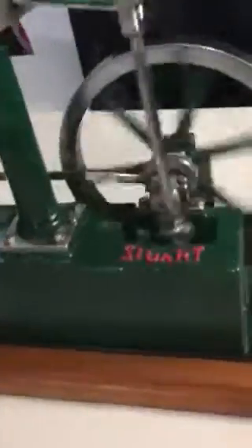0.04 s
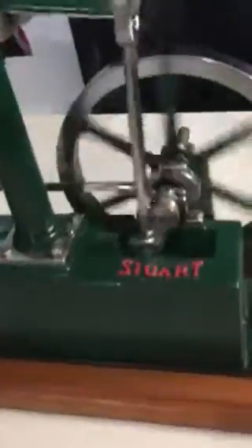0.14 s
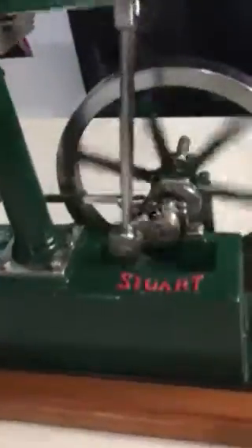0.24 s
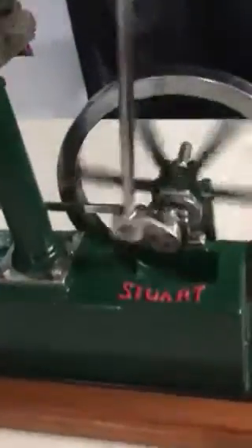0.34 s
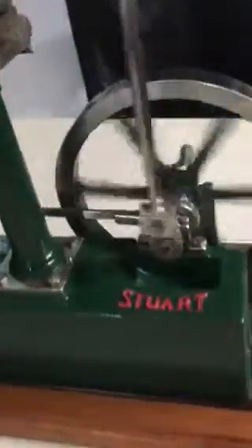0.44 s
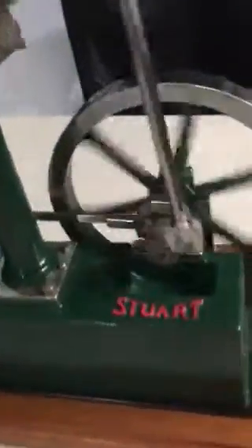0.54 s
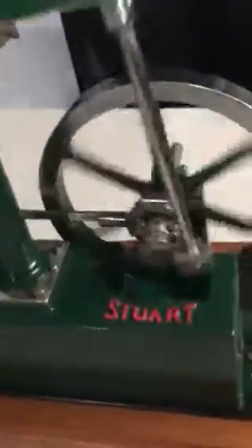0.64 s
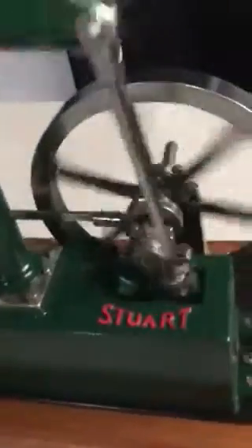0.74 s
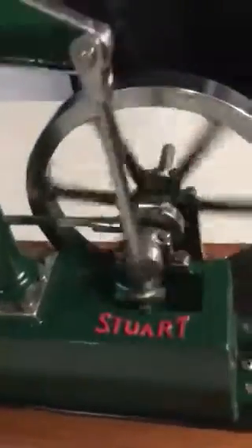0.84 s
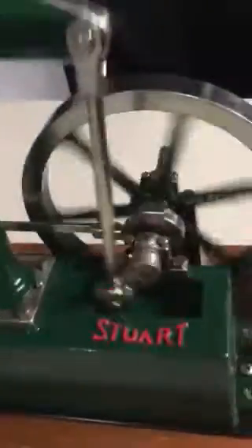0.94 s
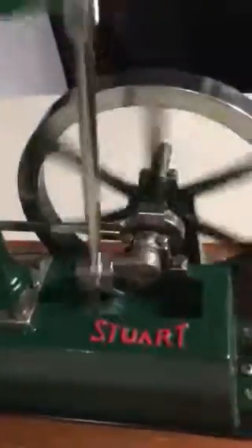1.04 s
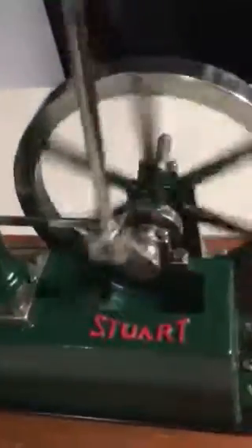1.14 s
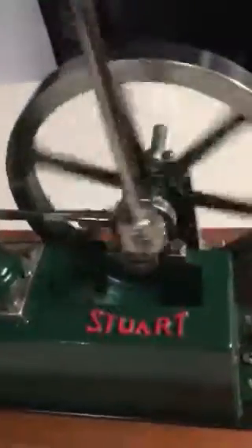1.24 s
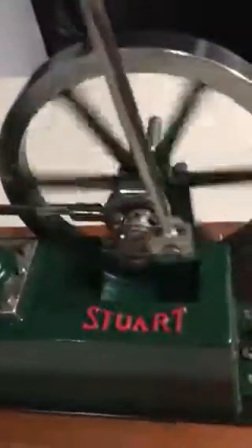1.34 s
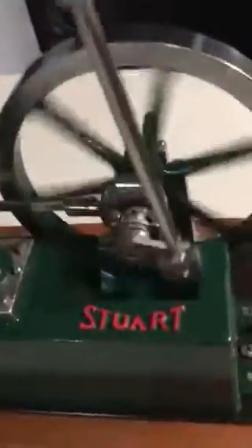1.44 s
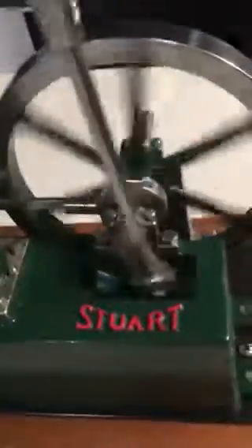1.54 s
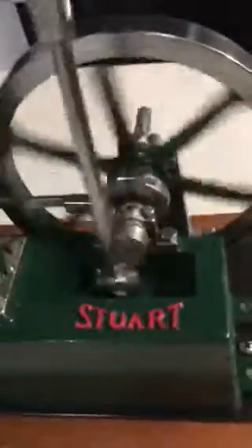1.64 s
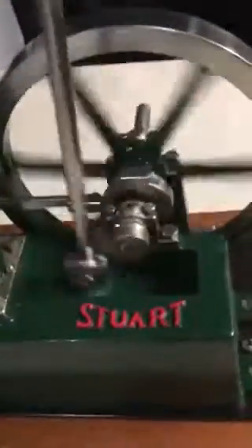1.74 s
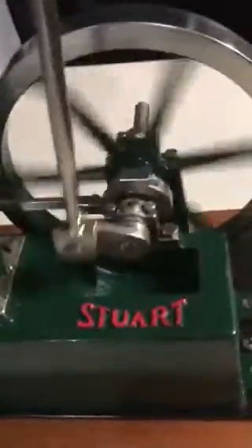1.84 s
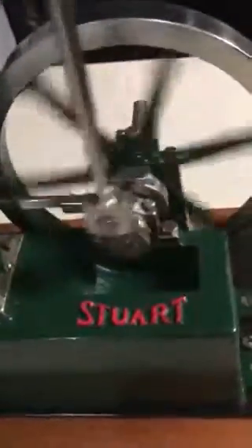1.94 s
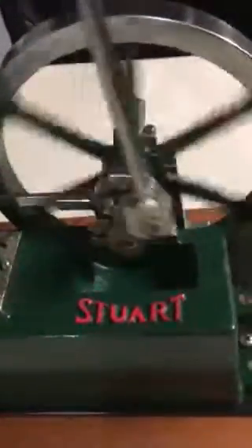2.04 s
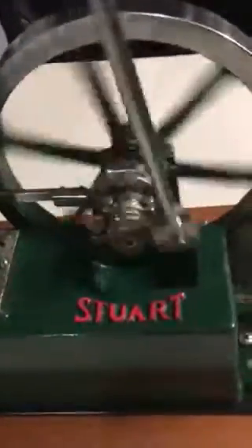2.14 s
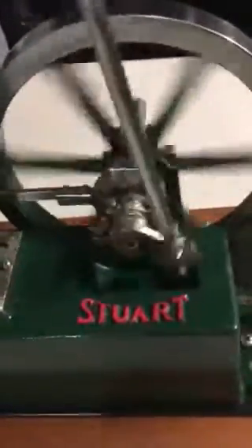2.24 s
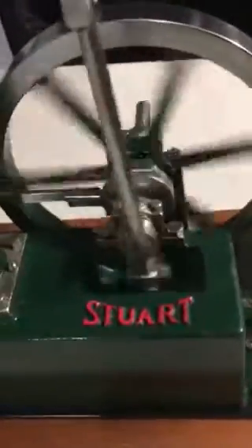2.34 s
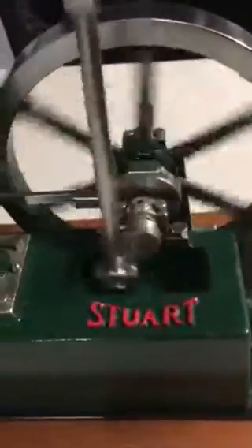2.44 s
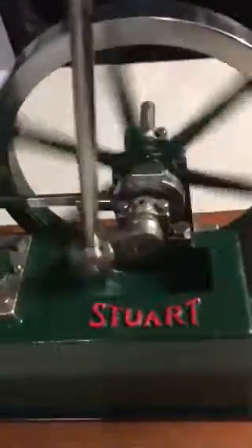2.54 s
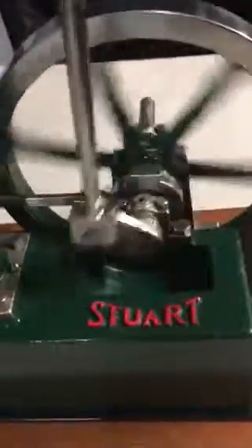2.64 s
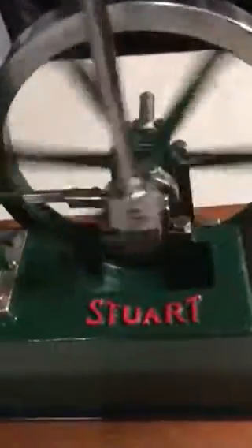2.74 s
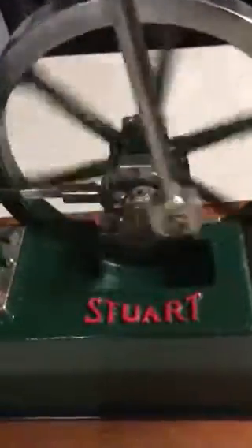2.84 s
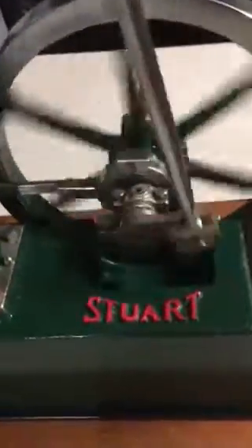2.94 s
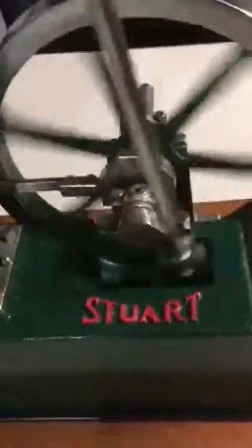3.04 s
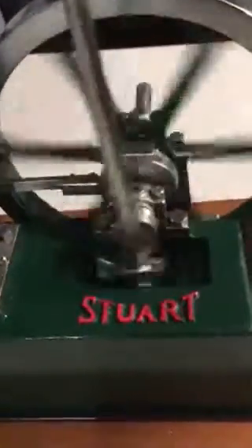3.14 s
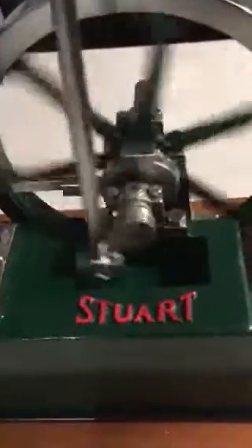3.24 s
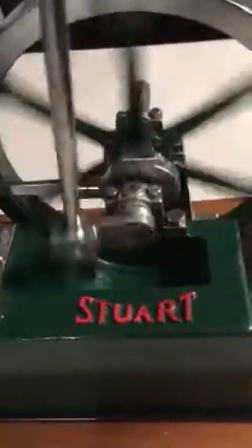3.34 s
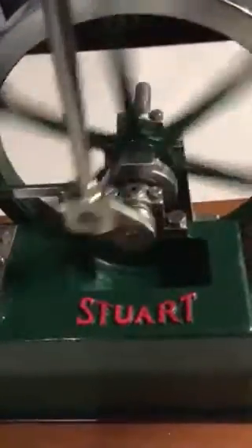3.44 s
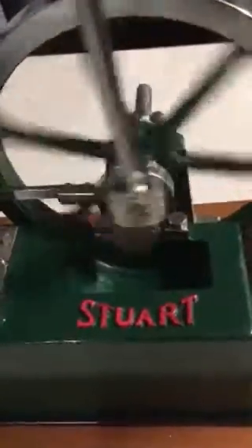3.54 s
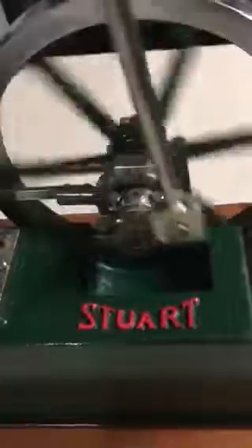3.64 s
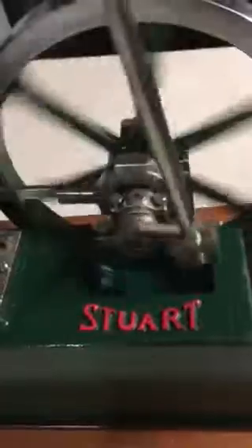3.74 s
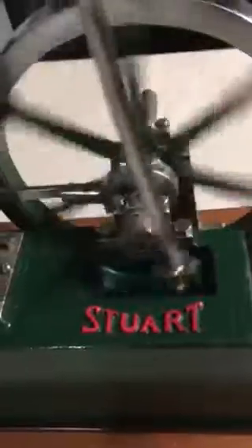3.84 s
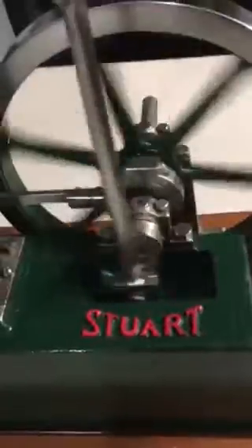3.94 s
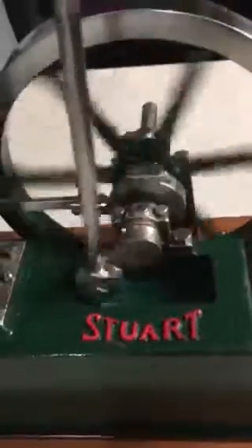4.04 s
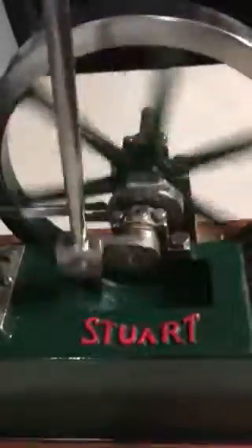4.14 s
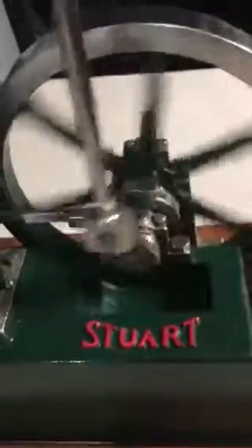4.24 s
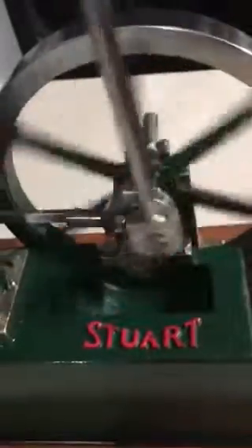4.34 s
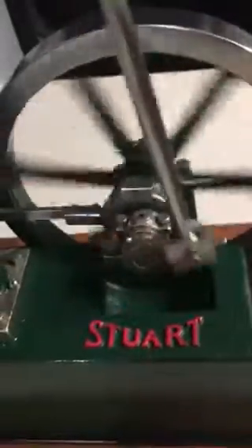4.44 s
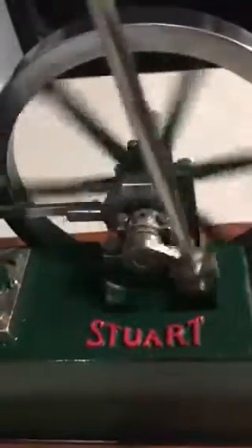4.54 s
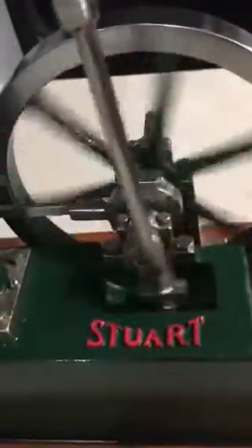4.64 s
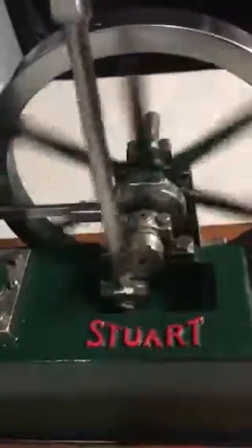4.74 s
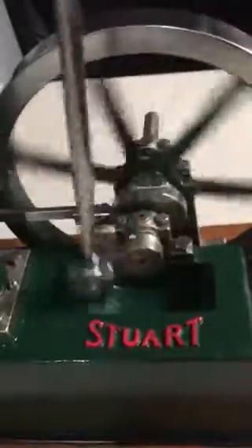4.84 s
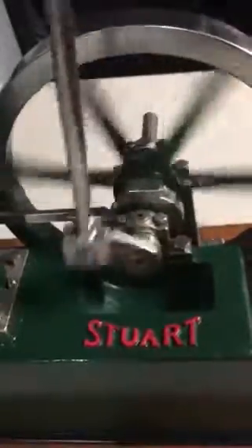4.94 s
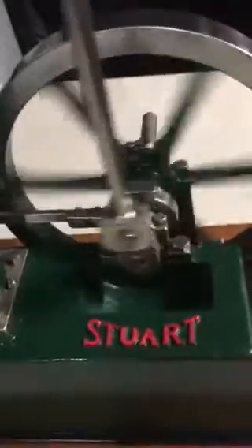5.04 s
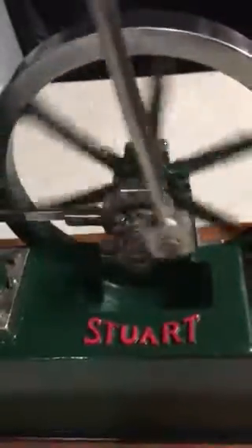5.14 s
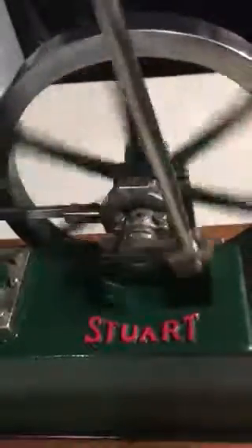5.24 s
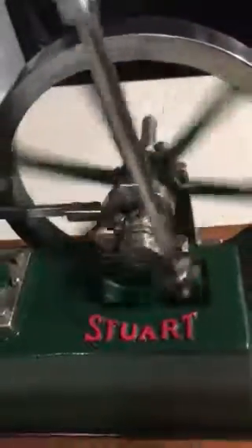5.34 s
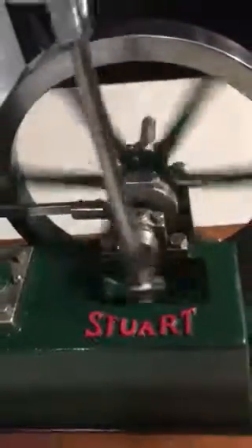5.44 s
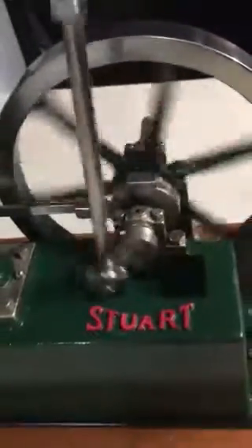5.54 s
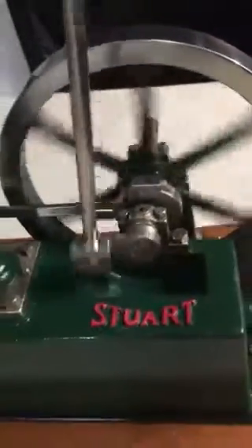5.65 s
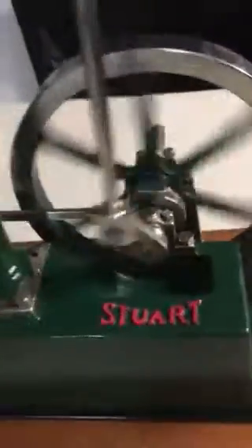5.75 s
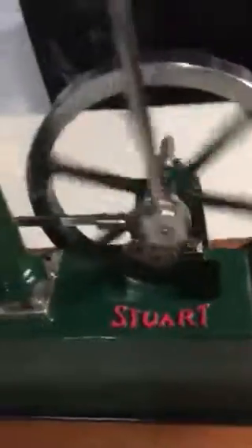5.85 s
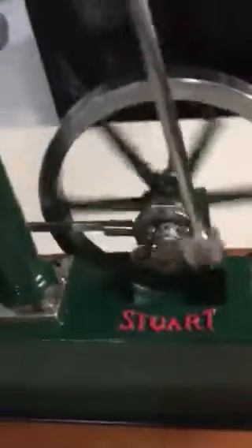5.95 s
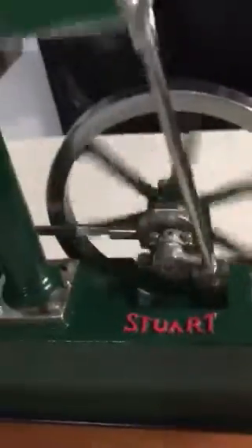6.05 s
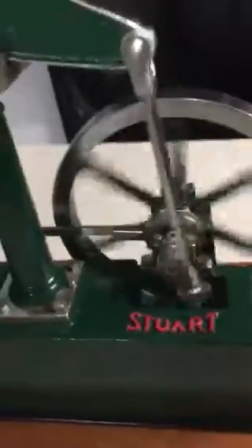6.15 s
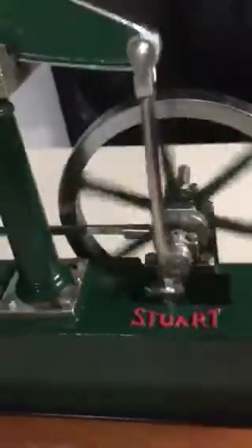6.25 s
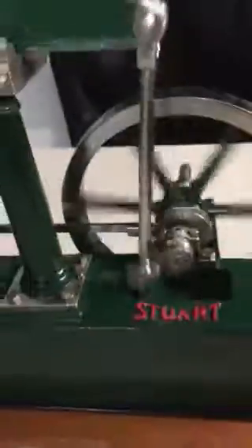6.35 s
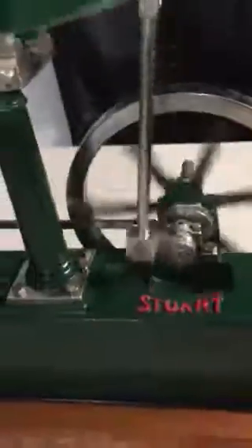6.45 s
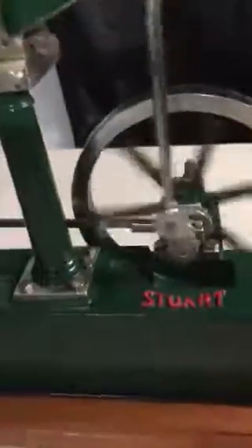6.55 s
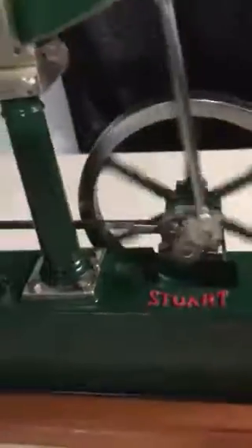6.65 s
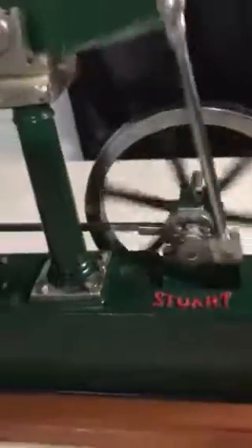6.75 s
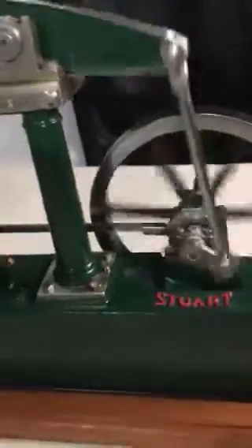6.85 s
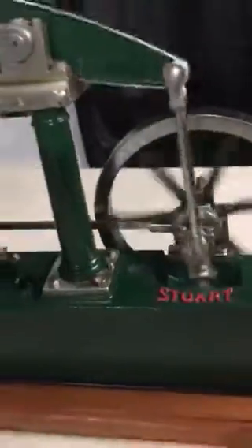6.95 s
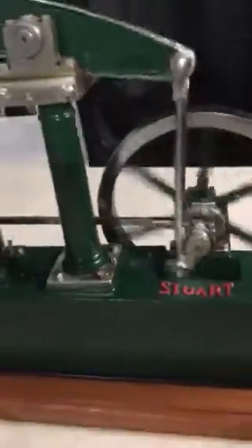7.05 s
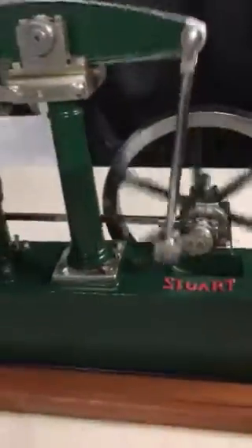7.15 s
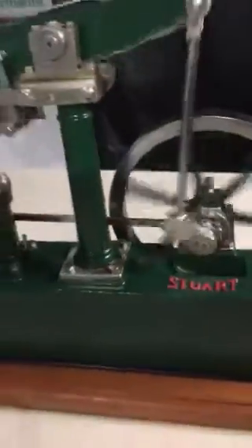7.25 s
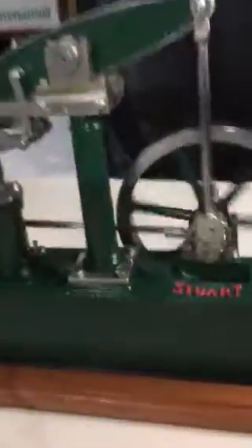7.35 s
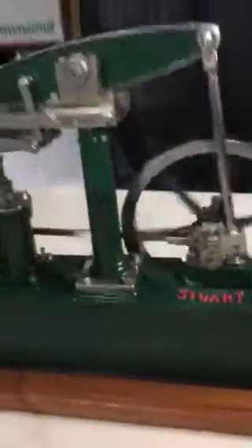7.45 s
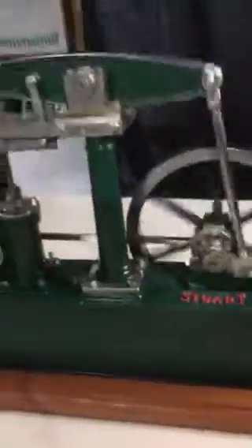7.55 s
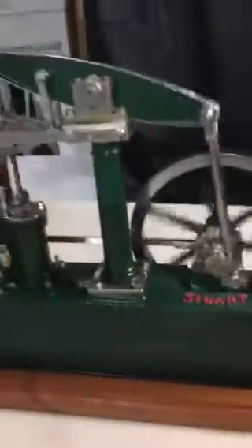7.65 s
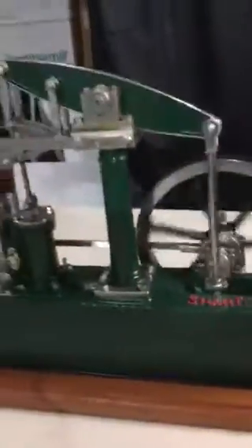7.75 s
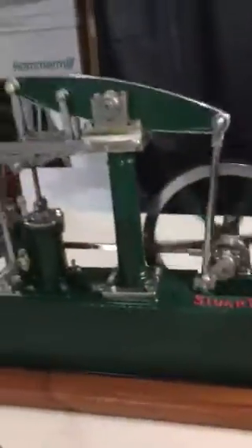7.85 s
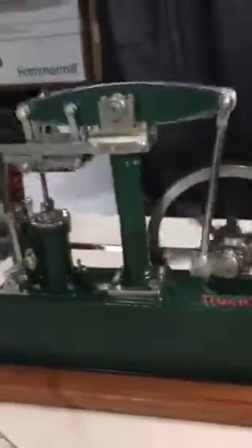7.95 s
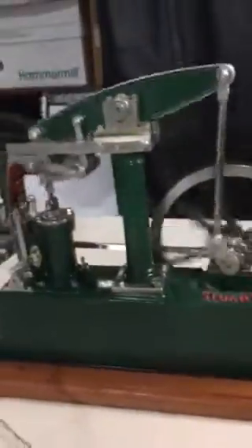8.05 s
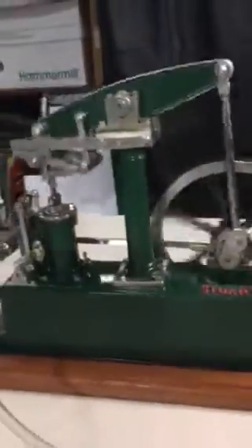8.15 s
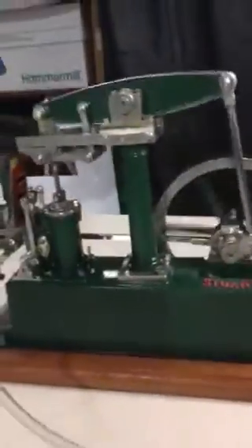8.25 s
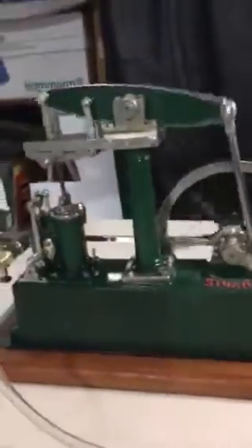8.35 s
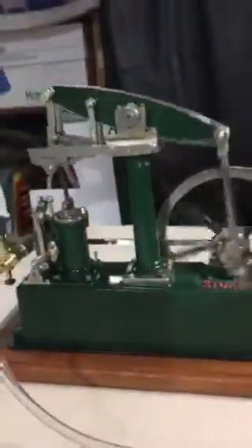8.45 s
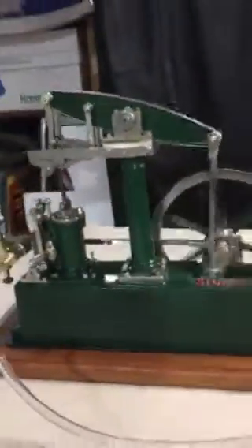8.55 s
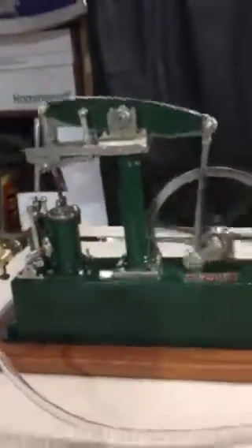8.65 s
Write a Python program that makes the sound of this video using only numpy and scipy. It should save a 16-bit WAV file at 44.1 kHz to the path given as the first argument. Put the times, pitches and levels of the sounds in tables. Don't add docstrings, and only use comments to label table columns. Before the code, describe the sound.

Sharp steel knocks repeat every three-quarters of a second over a hollow wooden boom, pulsing compressed-air hiss and light valve clicks.

```python
import sys
import numpy as np
from scipy import signal
from scipy.fft import rfft, irfft, next_fast_len
from scipy.io import wavfile
from scipy.ndimage import uniform_filter1d

SR = 44100
rng = np.random.default_rng(int(sys.argv[2]) if len(sys.argv) > 2 else 0)


def digitize_waveform(pressure):
    field = np.atleast_2d(pressure).T
    bounded = np.clip(field, -1, 1)
    quanta = np.round(bounded * 32767).astype(np.int16)
    wavfile.write(sys.argv[1], SR, quanta)


def gain_from_decibels(decibels):
    exponent = np.asarray(decibels, float) / 20
    return 10 ** exponent


N = 383669
TURN_S, CUT_S = .7635, .298

# (time [s], strength [dB], tick of the slack just before [dB])
KNOCKS = [(0.6101, -15, -15), (1.3716, -14.5, -11), (2.1359, -14, -11), (2.9064, -14, -10.5),
          (3.6609, -13, -38), (4.4317, -13.5, -11), (5.1933, -13, -18), (5.9537, -15, -13.5),
          (6.715, -17.5, -16), (7.4792, -19.8, -21), (8.2439, -20.5, -25)]
# (time [s], opening [dB], seats after [s], seating [dB])
VALVES = [(0.534, -42.5, .0434, -40), (1.294, -39.5, 0.043, -39), (2.0589, -40.5, .0442, -38),
          (2.828, -38, 0.042, -37), (3.6054, -39.5, 0.042, -35), (4.354, -38.5, 0.044, -37),
          (5.117, -38.5, 0.04, -37), (5.877, -40.5, .0446, -38.5), (6.638, -40.5, 0.042, -38),
          (7.4028, -43, 0.039, -42), (8.166, -43.5, 0.043, -41.5)]
# (time [s], cut-off [dB], link [dB])
CUTS = [(0.1423, -38, -40), (0.9055, -37, -41.5), (1.6678, -35.5, -37.5), (2.434, -36.5, -38),
        (3.2093, -35, -38.5), (3.9618, -35.5, -37.5), (4.7286, -34.5, -44), (5.489, -35.5, -39),
        (6.2502, -38, -41), (7.0138, -39.5, -42), (7.776, -41.5, -46.5), (8.544, -44, -48)]
# (frequency [Hz], level [dB], t60 [s])
PIN_MODES = [(5920, -13, 0.006), (6940, -1.5, 0.0056), (8400, -3, 0.0021), (10240, -12, 0.0014),
             (11900, -6, 0.003), (14520, -8, 0.002), (14720, -16, .004)]
# (frequency [Hz], level [dB], t60 [s])
FRAME_MODES = [(639.8, -23.5, 0.11), (735, -8.5, 0.035), (813, -21.5, 0.18), (926, -12.5, 0.027),
               (1130, -17.5, 0.098), (1247, -4, 0.02), (1316, -31, .25), (1459, -7.5, 0.031),
               (1612, -6.5, 0.035), (1690, -27, 0.03), (1938, -2, 0.004), (2134, -2.5, 0.022),
               (2359, -3, 0.0057), (2551, -6, 0.015), (2774, -11, 0.0077), (3390, -11.5, 0.0041),
               (3869, -5.5, 0.0089)]
# (frequency [Hz], level [dB], t60 [s])
BASE_MODES = [(88, -10, 0.58), (139.4, -8.5, 0.97), (180, -7.5, 0.42), (203.3, -1, 0.075),
              (215.8, -5.5, 0.53), (280.5, -10, 0.4), (313.6, -11.5, 0.47), (371.3, -9.5, 0.12),
              (494, -18, 0.093)]


def crank_knock():
    # (frequency [Hz], level [dB], t60 [s])
    bed_modes = [(80.7, -29, 0.19), (133.4, -13, 0.68), (176.6, -12, 0.66), (207.7, 6.5, 0.056),
                 (207, -10, 0.64), (278.4, -7.5, 0.25), (363.5, -3.5, 0.069), (414.7, -17, 0.36),
                 (481, -11, 0.2)]
    pin_s, pin_db, _ = np.transpose(KNOCKS)
    rows = contacts("knock", pin_s, pin_db)
    tick = strike(rows, column=1, modes=PIN_MODES, late_s=-.0002, cycles=8., scatter_db=1.,
                  detune=.008, crack_db=-7, fresh=.5)
    ring = strike(rows, column=2, modes=FRAME_MODES, late_s=-.0001, cycles=10.5, scatter_db=1.6,
                  detune=0.0032, crack_db=-7, fresh=.3)
    thump = strike(rows, column=3, modes=bed_modes, late_s=-0.00308, cycles=3.0, scatter_db=0.7,
                   detune=.001, crack_db=-23, fresh=0.38)
    return tick, ring, thump


def pin_slack():
    lead_s, ring_db = .0081, -36
    pin_s, pin_db, slack_db = np.transpose(KNOCKS)
    rows = list(zip(pin_s - lead_s, slack_db, pin_db + ring_db))
    for s, tick_db, frame_db, _ in contacts("knock", pin_s, pin_db):
        rows.append((s - .0024, tick_db - 17, frame_db - 16))
    tick = strike(rows, column=1, modes=PIN_MODES, late_s=.0001, cycles=6., scatter_db=8.0,
                  detune=0.019, crack_db=-5.5, fresh=0.96)
    return tick * gain_from_decibels(-4.5), loose_frame(rows), 0


def slide_valve():
    # (time after the first blow [s], level [dB])
    bounces = [
        (.0055, -3),
        (.010, -20),
        (.016, -5),
    ]
    open_s, open_db, seat_s, seat_db = np.transpose(VALVES)
    opening = contacts("valve", open_s, open_db)
    chatter = []
    for s, tick_db, ring_db, thump_db in opening:
        for after_s, db in bounces:
            chatter.append((s + after_s, tick_db + db, ring_db + db - 5, thump_db + db))
    return rod_joints(opening + chatter + contacts("seat", open_s + seat_s, seat_db))


def beam():
    # (time [s], level [dB])
    landings = [(0.2179, -38.5), (0.9817, -36.5), (1.7461, -35.5), (2.5118, -36), (3.2878, -35.5),
                (4.0366, -35), (4.8064, -35.5), (5.5658, -36.5), (6.327, -37.5), (7.088, -37.5),
                (7.8514, -41.5), (8.6188, -41.5)]
    # (time after landing [s], level [dB])
    rattle = [
        (.006, -6),
        (.011, -8),
        (.019, -17),
    ]
    lift_lag_s, settle_lag_s, settle_db = .0652, 0.016, -5.5
    land_s, beam_db = np.transpose(landings)
    cut_s = np.array(CUTS)[:, 0]
    lift = contacts("lift", cut_s + lift_lag_s, beam_db)
    land = contacts("land", land_s, beam_db)
    rattles = []
    for s, tick_db, ring_db, thump_db in land:
        for after_s, db in rattle:
            rattles.append((s + after_s, tick_db + db + 1, ring_db + db, thump_db + db))
    tick, ring, thump = rod_joints(lift + land + rattles)
    return tick, ring + lever_stop(list(zip(land_s + settle_lag_s, beam_db + settle_db))), thump


def cut_off_lever():
    # (frequency [Hz], level [dB], t60 [s])
    stud_modes = [(3720, 2, 0.014), (4370, -14, 0.014), (5870, 7, 0.0069), (6850, -18, 0.0036)]
    # (frequency [Hz], level [dB], t60 [s])
    lever_modes = [(1007.6, -14.5, 0.03), (1650, -10, 0.016), (1857, -6, 0.014), (2120, 2, 0.014),
                   (2270, 1.5, 0.017), (2600, -8, 0.012), (3335, -13, 0.012), (4023, -10, 0.012)]
    link_lead_s = .0688
    cut_s, cut_db, link_db = np.transpose(CUTS)
    cut = contacts("cut", cut_s, cut_db)
    rows = contacts("link", cut_s - link_lead_s, link_db) + cut
    tick = strike(rows, column=1, modes=stud_modes, late_s=.0001, cycles=1.9, scatter_db=4.5,
                  detune=0.054, crack_db=5, fresh=0.88)
    ring = strike(rows, column=2, modes=lever_modes, late_s=-0.00023, cycles=10.0, scatter_db=2.5,
                  detune=0.021, crack_db=-7.5, fresh=0.61)
    rebound = lever_stop([(s + .010, ring_db - 3) for s, _, ring_db, _ in cut])
    return tick * gain_from_decibels(4.5), ring * gain_from_decibels(8.5) + rebound, loose_base(rows)


def rod_joints(rows):
    # (frequency [Hz], level [dB], t60 [s])
    rod_modes = [(3700, -6, 0.0055), (6160, 2, 0.0078), (8300, 8, .005), (9800, 2.5, 0.012),
                 (13000, 8, 0.0073), (13700, -4, 0.0047)]
    tick = strike(rows, column=1, modes=rod_modes, late_s=.0001, cycles=5.8, scatter_db=3.0,
                  detune=0.066, crack_db=-2, fresh=0.88)
    return tick * gain_from_decibels(5.5), loose_frame(rows), loose_base(rows)


def lever_stop(rows):
    # (frequency [Hz], level [dB], t60 [s])
    stop_modes = [(378.7, -4, 0.12), (655, 1, 0.031), (905, 1.5, 0.024), (1085, -3, 0.073),
                  (1485, -22, .03)]
    return strike(rows, column=1, modes=stop_modes, late_s=0, cycles=2.8, scatter_db=4.5,
                  detune=0.045, crack_db=-9.5, fresh=0.59)


def loose_frame(rows):
    return gain_from_decibels(6.0) * strike(rows, column=2, modes=FRAME_MODES, late_s=0.00019, cycles=6., scatter_db=3.0,
                             detune=0.041, crack_db=-5.5, fresh=0.89)


def loose_base(rows):
    return gain_from_decibels(4.5) * strike(rows, column=3, modes=BASE_MODES, late_s=-0.0011, cycles=1.7, scatter_db=2.5,
                             detune=0.016, crack_db=-16.5, fresh=1.0)


def contacts(part, s, db):
    # (steel tick [dB], casting ring [dB], base thump [dB]) over its strength
    parts = dict(knock=(1.5, 0, -11.5), valve=(3.5, -0.7, -16.5), seat=(0.83, 0, -8), link=(-1, 0, -32),
             cut=(-2.5, 0, -9), lift=(-1.3, -11, -9), land=(-0.85, -3.3, -8))
    thump_share, tick_scatter_db = 0.37, 2.5
    tick, ring, thump = parts[part]
    loose = 0 if part == "knock" else tick_scatter_db * rng.standard_normal(len(s))
    thump_db = db.mean() + thump_share * (db - db.mean()) + thump
    return list(zip(s, db + tick + loose, db + ring, thump_db))


def strike(blows, column, modes, late_s, cycles, scatter_db, detune, crack_db, fresh):
    out = np.zeros(N + SR)
    hz, db, t60 = np.transpose(modes)[:, :, None]
    rise = cycles / np.sqrt(hz * hz.max())
    t = np.arange(int(SR * (.75 * t60.max() + rise.max()))) / SR
    sign = (-1.) ** np.arange(len(hz))[:, None]
    build = np.sin(np.pi / 2 * np.minimum(t / rise, 1)) ** 2
    shape = sign * build * gain_from_decibels(db - 60 * np.maximum(t - rise, 0) / t60)
    band = signal.butter(2, [0.8 * hz.min(), min(0.82 * hz.max(), .4 * SR)], "band", fs=SR)
    crack = gain_from_decibels(crack_db) * np.sqrt(np.sum(shape ** 2, axis=0))
    usual = np.sqrt(1 - min(fresh, 1) ** 2) * rng.standard_normal(len(t))
    for row in blows:
        pitch, level = rng.standard_normal((2, len(hz), 1))
        grit = usual + fresh * rng.standard_normal(len(t))
        tones = np.sin(2 * np.pi * hz * (1 + detune * pitch) * t)
        ring = np.sum(shape * gain_from_decibels(scatter_db * level) * tones, axis=0)
        ring += signal.lfilter(*band, crack * grit) * np.sqrt(SR / 2 / hz.max())
        i = int((row[0] + late_s) * SR)
        out[i:i + len(t)] += gain_from_decibels(row[column]) * ring / np.abs(ring).max()
    return out[:N]


def crank():
    valve_s = .6865
    knock, cut, valve = (np.array(table)[:, 0] for table in (KNOCKS, CUTS, VALVES))
    s = np.r_[knock[0] - TURN_S, knock, knock[-1] + TURN_S, cut, valve]
    turns = np.arange(len(knock) + 2) * TURN_S
    angle = np.r_[turns, turns[:len(cut)] + CUT_S, turns[:len(valve)] + valve_s]
    return np.interp(np.arange(N) / SR, np.sort(s), np.sort(angle)) % TURN_S


def air(turn, far):
    # (frequency [Hz], width [Hz], up stroke [dB], down stroke [dB],
    # change when far [dB], share of the swell with piston speed [ratio])
    ports = [(1403, 208, 0.5, -2, -9, 1), (3029, 100, 2, -2, -8, 1), (3260, 480, -15.5, -20, 6.5, 0.85),
             (5020, 220, -2.5, -6.5, 5, 1.5), (5810, 610, -8, -17.5, -5, 1.5),
             (6263, 240, -1, -3, -15.5, 0.89), (7660, 820, -12.5, -18, -5, 2.1),
             (8500, 320, -4.5, -5.5, -9, 1.37), (9560, 360, -9.5, -5, -25, 0.36),
             (10750, 430, -11.5, -10, -15, 1.5), (12130, 630, -33, -17.5, 0.5, 0.27)]
    # (frequency [Hz], density [dB])
    leak_shape = [(300, -0.5), (500, -9), (1200, -9.5), (2200, -5), (4000, -13.5), (4600, -5), (6000, -6),
                  (7500, -10), (9500, -5.5), (11000, -10), (13000, -7.5)]
    # (frequency [Hz], density [dB])
    seep_shape = [(3000, -1), (9000, -3), (12000, -0.5), (14500, 7), (15750, 0), (15900, -38), (16900, -40)]
    seep_db = -56.5
    hiss_db, leak_db = hiss_level(turn), leak_level(turn)
    down = np.clip((turn - CUT_S) / 0.023, 0, 1)
    flow = cylinder(turn, far)
    for hz, width, up_db, down_db, far_db, swell in ports:
        db = up_db + (down_db - up_db) * down + far_db * far
        db = db + (swell - 1) * (hiss_db - hiss_db.max()) + 0.7 * walk(12)
        flow = flow + gain_from_decibels(db) * np.sqrt(width / 1500) * peak(hz, width)
    leak = gain_from_decibels(leak_db - 7.4 * far + 1.5 * walk(20)) * noise(leak_shape)
    seep_level = seep_db + 0.34 * (leak_db - leak_db.mean()) - 8.4 * far + 0.6 * walk(9.3)
    return gain_from_decibels(hiss_db) * flow + leak + gain_from_decibels(seep_level) * noise(seep_shape)


def cylinder(turn, far):
    # (from [s], to [s] after the knock, from [Hz], to [Hz], width [Hz],
    # level [dB], change when far [dB])
    slides = [(.10, 0.257, 8420, 9550, 260, -2, -7), (.11, 0.21, 6530, 7100, 220, -4, -4),
              (.17, 0.305, 7400, 6550, 163, -14, 8), (.11, 0.216, 9600, 10600, 199, -4.5, -11),
              (.40, 0.596, 8800, 9800, 147, -3, -10), (.46, 0.655, 8570, 9840, 150, -22, 14),
              (.43, .62, 10180, 10700, 203, -11, -21), (.70, .728, 8400, 8500, 120, 14, -22),
              (.70, .73, 13000, 13200, 300, 0, -4), (.70, 0.72, 5300, 5250, 180, -1, 7),
              (.70, 0.727, 3120, 3210, 120, 3, 6)]
    out = 0
    for start, end, from_hz, to_hz, width, db, far_db in slides:
        way = np.clip((turn - start) / (end - start), 0, 1)
        hz = (from_hz + (to_hz - from_hz) * way) * (1 + 0.02 * walk(1.4))
        flutter = signal.lfilter(*signal.butter(2, width / 2, fs=SR), rng.standard_normal((2, N)))
        carrier = np.exp(2j * np.pi * np.cumsum(hz) / SR)
        tone = np.real((flutter[0] + 1j * flutter[1]) * carrier) / flutter.std()
        level = gain_from_decibels(db + far_db * far + 2.0 * walk(3.1)) * np.sqrt(width / 1500)
        out = out + level * np.sin(np.pi * way) * tone
    return out


def hiss_level(turn):
    # (start [s], full [s], closing [s], end [s], level [dB])
    hiss = [
        (0.0036, 0.18, 0.15, 0.38, -44),
        (0.381, 0.49, 0.53, 0.71, -45.5),
        (0.3, 0.36, .378, 0.395, -50),
        (0.71, 0.708, 0.824, 0.823, -55.5),
    ]
    shut_s, shut_db = .012, -10
    db = swells(turn, hiss, sharp=1.52, shut_db=-67.5)
    up_end_s = hiss[0][3]
    return db + shut_db * np.clip(np.minimum(turn - CUT_S, up_end_s - turn) / shut_s, 0, 1)


def leak_level(turn):
    # (start [s], full [s], closing [s], end [s], level [dB])
    leaks = [
        (-0.031, 0.041, 0.17, 0.34, -52),
        (.36, 0.49, .39, 0.396, -55),
        (0.31, 0.52, 0.59, 0.686, -57.5),
        (.688, 0.77, 0.67, .74, -47.5),
        (.755, .759, 0.747, .77, -38.5),
    ]
    return swells(turn, leaks, sharp=0.73, shut_db=-62.5)


def swells(turn, rows, sharp, shut_db):
    out = gain_from_decibels(shut_db)
    for start, full, closing, end, db in rows:
        s = (turn - start) % TURN_S + start
        opening = (s - start) / max(full - start, 1e-3)
        shutting = (end - s) / max(end - closing, 1e-3)
        way = np.clip(np.minimum(opening, shutting), 0, 1)
        out = out + gain_from_decibels(db) * np.sin(np.pi / 2 * way) ** sharp
    return 20 * np.log10(out)


def shudder(turn):
    shake = 0
    for hz, mode_db, t60 in BASE_MODES:
        db = mode_db - 6.5 * np.log2(hz / 200) + 2.6 * walk(13)
        shake = shake + gain_from_decibels(db) * peak(hz, 6 / t60)
    return gain_from_decibels(jolts(turn)) * shake / shake.std()


def jolts(turn):
    # (time after the knock [s], level [dB])
    reversals = [
        (0, -37.5),
        (.306, -42.5),
        (0.372, -42.5),
        (0.412, -48.5),
        (.74, -51.5),
    ]
    rise_s, fall_db_per_s = 0.017, 139
    out = 1e-5
    for s, db in reversals:
        age = (turn - s + rise_s) % TURN_S
        out = out + gain_from_decibels(db - fall_db_per_s * age) * np.minimum(age / rise_s, 1)
    return 20 * np.log10(out)


def hand():
    # (time [s], distance [0 near - 1 far], air level [dB])
    phone = [(0, 0.89, 3.5), (.5, 0.4, 0.5), (1.2, 0.083, -1), (5.0, 0.033, -1), (5.8, 0.015, -1.5),
             (6.5, 0.61, 2), (7.2, 0.97, 4), (7.9, 0.8, 2.5), (8.2, 1, 2.5), (8.35, 0.85, 0.5),
             (8.7, 0.53, -1)]
    s, distance, air_db = np.transpose(phone)
    t = np.arange(N) / SR
    return np.interp(t, s, distance), np.interp(t, s, air_db)


def echo(x):
    t60_s, top_hz = 0.32, 1680
    t = np.arange(int(.5 * SR)) / SR
    tail = rng.standard_normal(len(t)) * gain_from_decibels(-60 * t / t60_s) * np.clip(t / 0.00073, 0, 1)
    tail = signal.lfilter(*signal.butter(4, top_hz, fs=SR), tail)
    return signal.fftconvolve(x, tail / np.sqrt(np.sum(tail ** 2)))[:N]


def house():
    # (frequency [Hz], density [dB])
    room_shape = [(25, -32), (40, -15.5), (58, 8.5), (70, -10), (84, 2.5), (108, -21), (136, -4.5),
                  (200, -11.5), (400, -30), (800, -25), (2000, -28), (2800, -55)]
    # (time [s], level [dB])
    drone = [
        (0, -71),
        (5.2, -74),
        (7.3, -73),
        (7.9, -64),
        (8.2, -67),
        (8.35, -59.5),
        (8.7, -59.5),
    ]
    room_db, swell_db = -56.5, 2.
    drone_db = np.interp(np.arange(N) / SR, *np.transpose(drone))
    hum = gain_from_decibels(room_db + swell_db * walk(3.004)) * noise(room_shape)
    return hum + gain_from_decibels(drone_db + 1.5 * walk(28)) * peak(628, 160)


def noise(shape):
    hz, db = np.transpose(shape)
    size = next_fast_len(N)
    f = np.maximum(np.arange(size // 2 + 1) * SR / size, 1)
    gain = gain_from_decibels(np.interp(np.log(f), np.log(hz), db, -80, -80))
    x = irfft(rfft(rng.standard_normal(size)) * gain, size)[:N]
    return x / x.std()


def peak(hz, width):
    ba = signal.iirpeak(hz, hz / width / 1.55, SR)
    x = signal.lfilter(*ba, signal.lfilter(*ba, rng.standard_normal(N)))
    return x / x.std()


def walk(rate):
    k = int(SR / rate)
    steps = np.repeat(rng.standard_normal(N // k + 1), k)
    return 1.63 * uniform_filter1d(uniform_filter1d(steps, k), k)[:N]


def scene():
    echo_db, echo_far_db = -18, 7.5
    turn = crank()
    far, air_db = hand()
    mechanisms = [crank_knock(), pin_slack(), slide_valve(), beam(), cut_off_lever()]
    ticks, ring, thump = (sum(layer) for layer in zip(*mechanisms))
    thump = signal.lfilter(*signal.butter(2, 65, "high", fs=SR), thump)
    tail = echo((ticks + ring) * gain_from_decibels(echo_db + echo_far_db * far))
    engine = ticks + ring + thump + tail + gain_from_decibels(air_db) * air(turn, far) + shudder(turn)
    return (engine + house())[None]


def top_cut(x):
    return signal.sosfilt(signal.butter(12, 16990, fs=SR, output="sos"), x)


def record(dry):
    low_pass = signal.ellip(5, .2, 17, 15900, fs=SR, output="sos")
    mix = signal.sosfilt(low_pass, dry)
    return top_cut(mix)


dry = scene()
out = record(dry)
digitize_waveform(out)
```